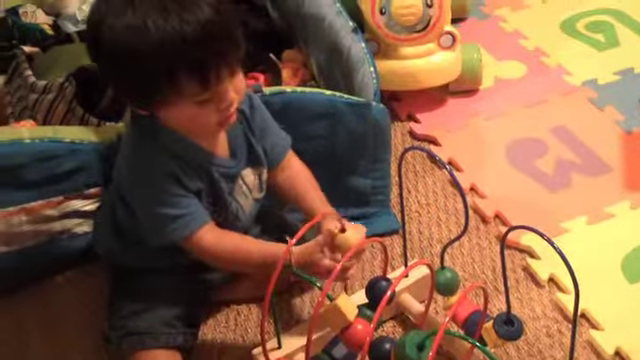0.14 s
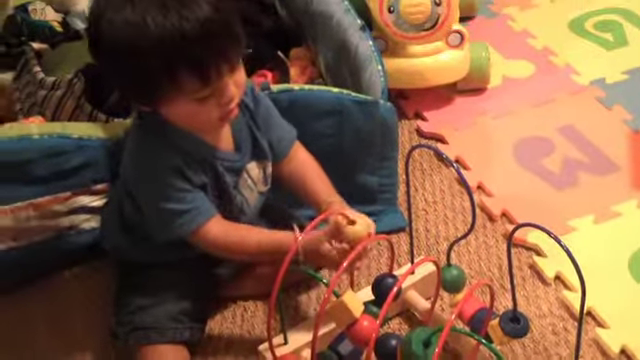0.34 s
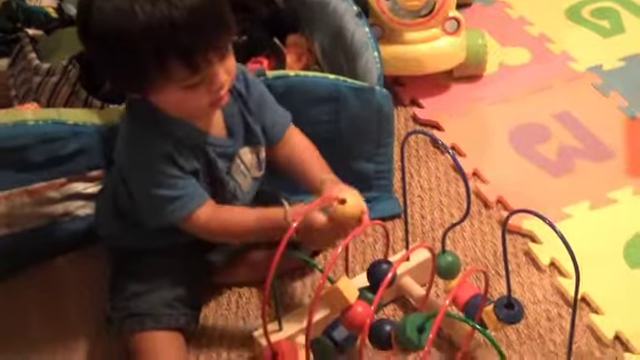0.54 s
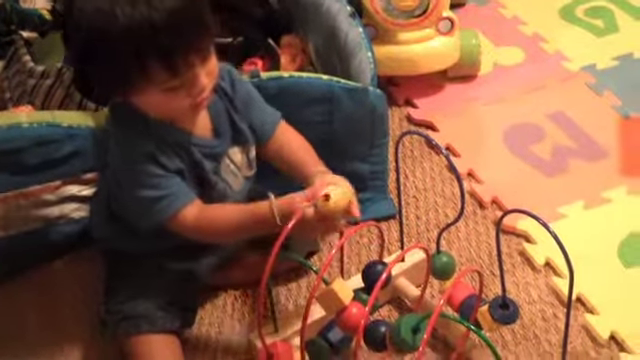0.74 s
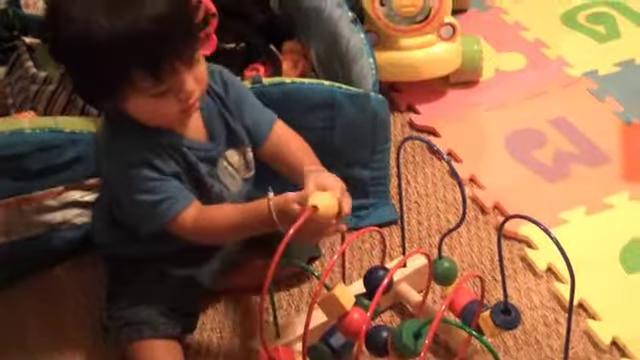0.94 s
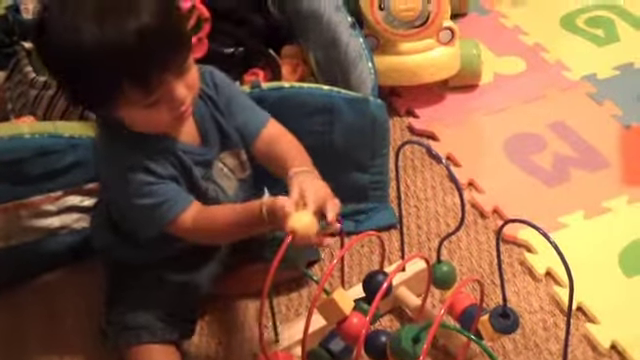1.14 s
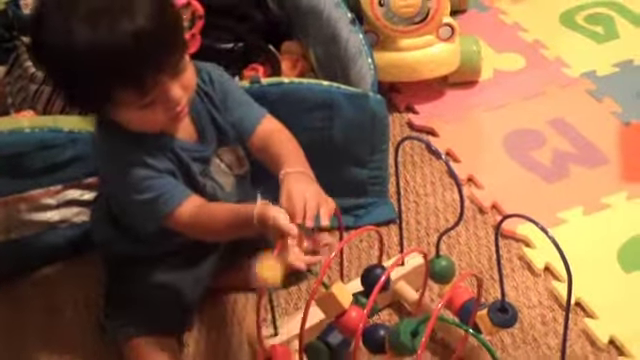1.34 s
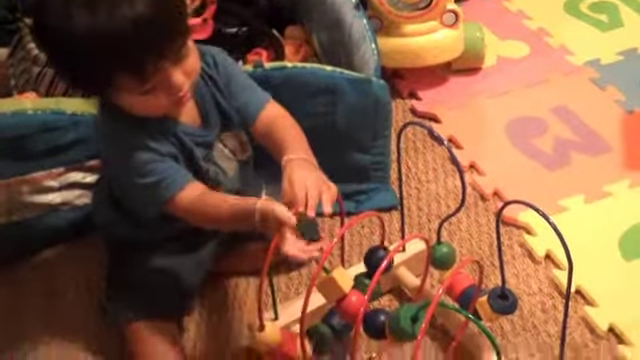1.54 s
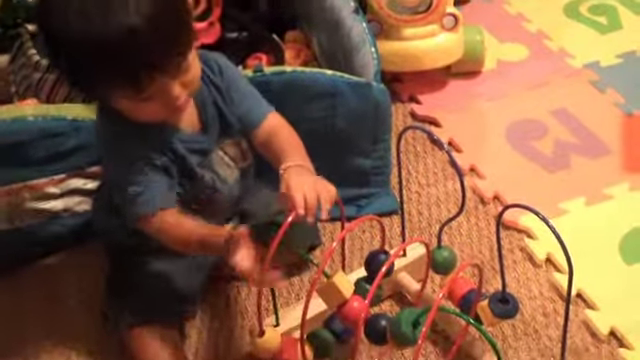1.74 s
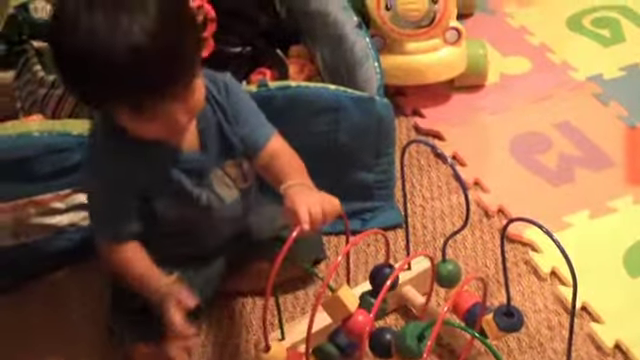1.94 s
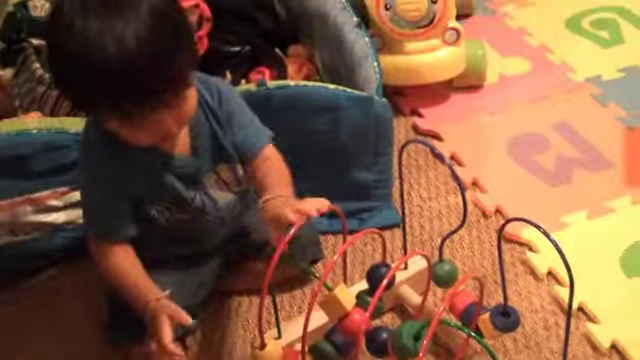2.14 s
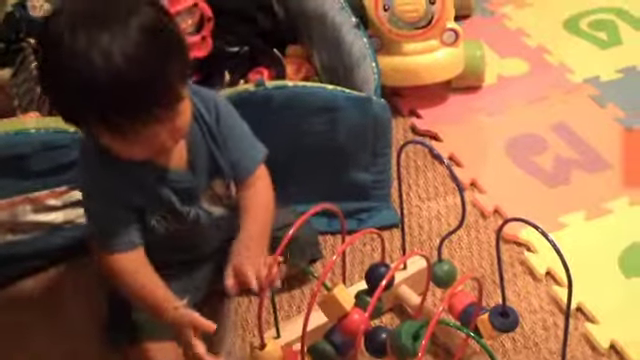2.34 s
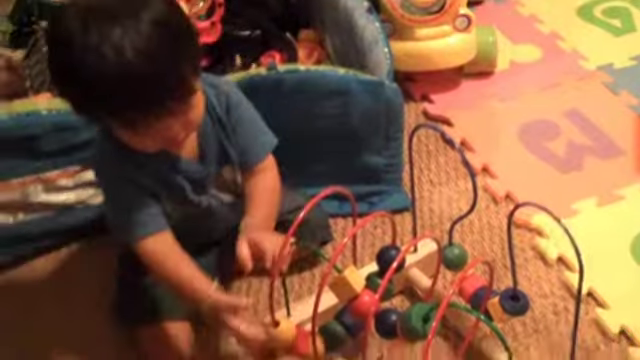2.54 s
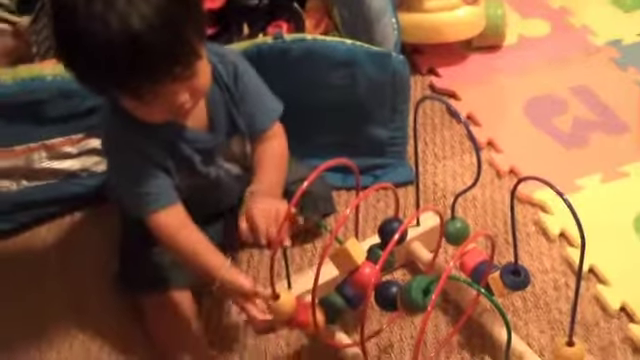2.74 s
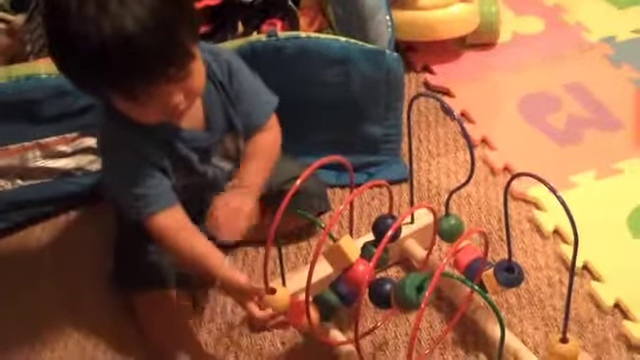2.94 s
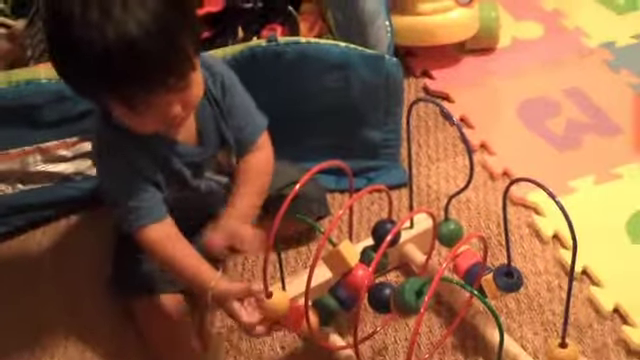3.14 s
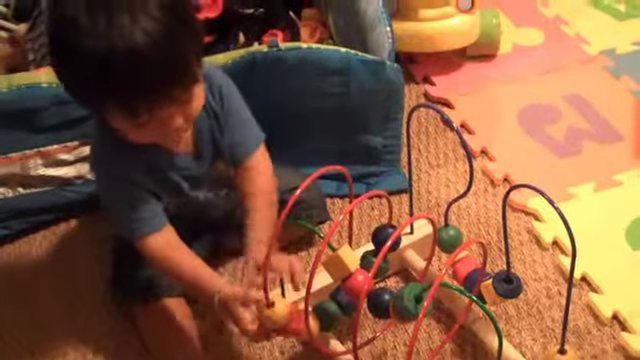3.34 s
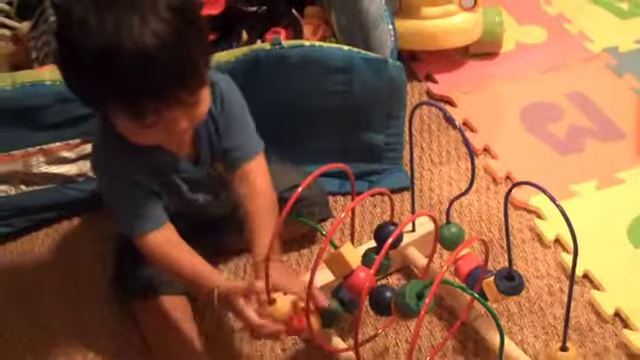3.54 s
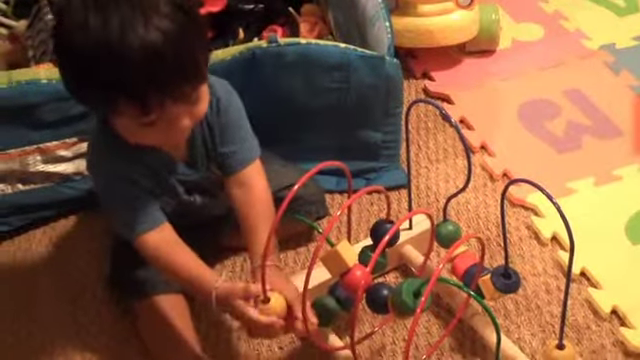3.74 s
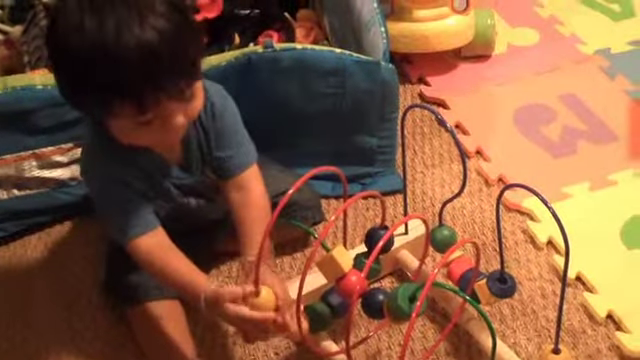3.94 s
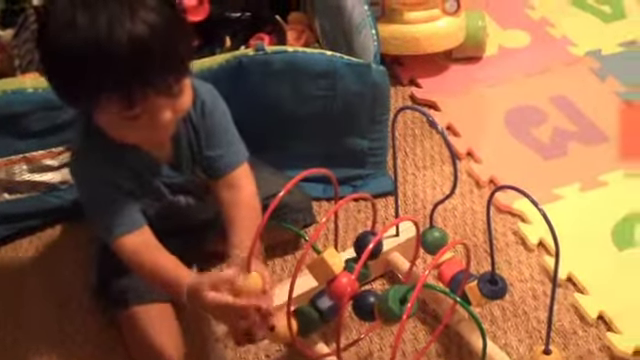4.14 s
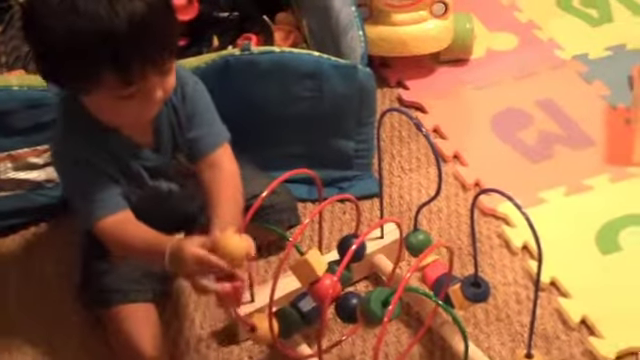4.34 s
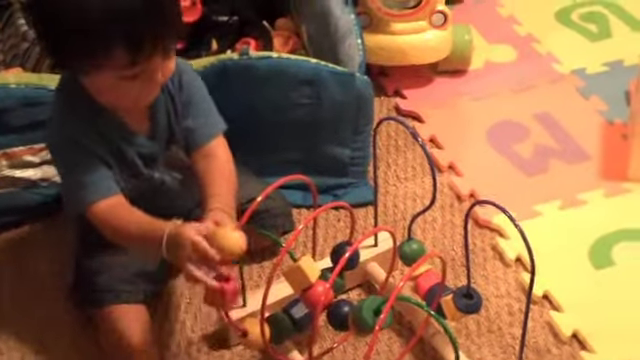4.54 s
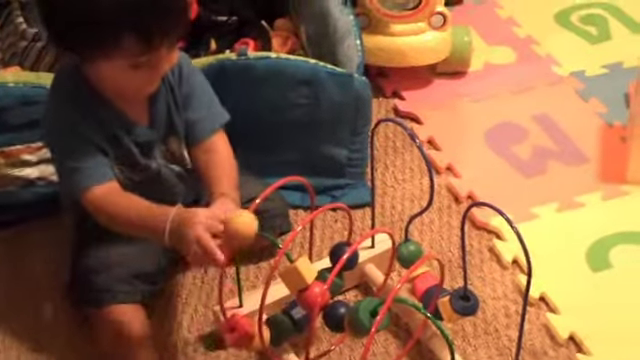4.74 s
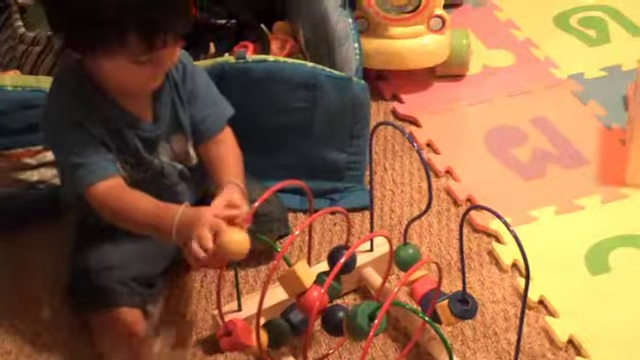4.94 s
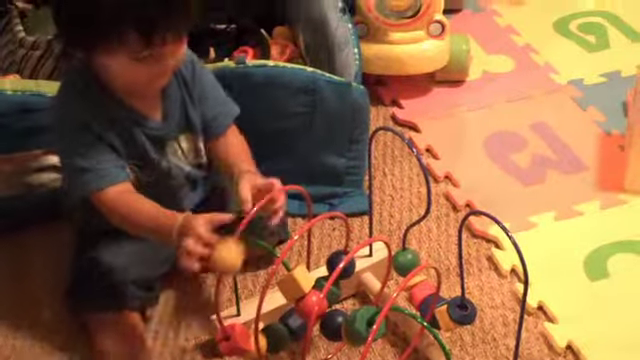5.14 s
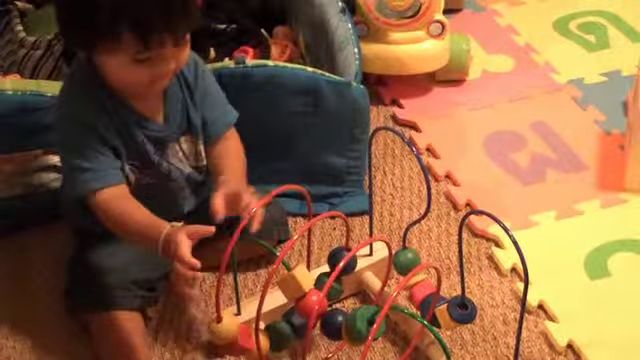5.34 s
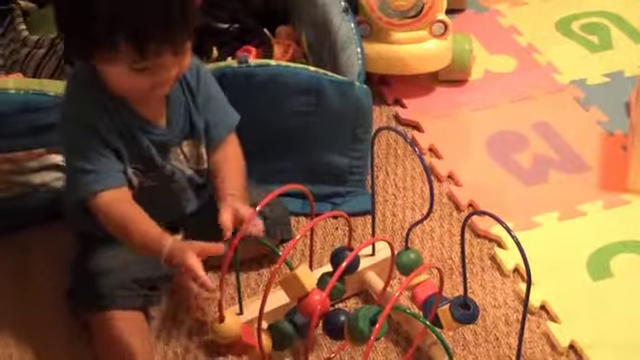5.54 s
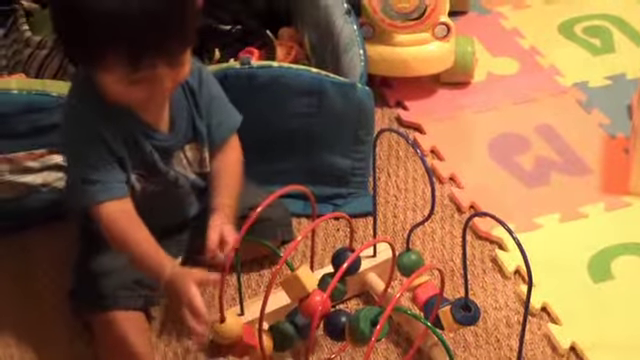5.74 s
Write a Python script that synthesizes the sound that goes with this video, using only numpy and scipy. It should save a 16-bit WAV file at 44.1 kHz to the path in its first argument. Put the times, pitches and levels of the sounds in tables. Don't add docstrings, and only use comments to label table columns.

```python
import sys
import numpy as np
from scipy import signal
from scipy.fft import rfft, irfft
from scipy.io import wavfile
from scipy.ndimage import uniform_filter1d

SR = 44100
rng = np.random.default_rng(int(sys.argv[2]) if len(sys.argv) > 2 else 0)


def generate_wav(sig):
    pcm = np.round(np.clip(np.atleast_2d(sig).T, -1, 1) * 32767).astype(np.int16)
    wavfile.write(sys.argv[1], SR, pcm)


def voltage_ratio(decibels):
    exponent = np.asarray(decibels, float) / 20
    return 10 ** exponent


N = 254623

# (rate [Hz], depth [fraction], time of a swell [s])
HUM_THROBS = [(2.1, .15, 4.4), (3.14, 0.23, 4.68)]
# (pitch [Hz], level [dB])
FAINT_TONES = [(207, -84.5), (331, -90.5), (561, -80.5)]
# (frequency [Hz], level [dB per Hz])
AIR_COLOR = [(10, -10.5), (25, -13.5), (110, -18.5), (200, -15.5), (300, -16), (600, -18), (1700, -22.5),
             (4000, -31.5), (7200, -37.5), (8000, -45), (8700, -61), (9200, -103)]
# (pitch [Hz], level [dB], time to fade 60 dB [s])
FRAME_TONES = [(1060, -8, .12), (1157, -4, .12), (1188, -4, .15), (1265, -2, .2), (1378, -6, .2),
               (1596, -12, .2), (1745, -4, .12), (1836, -2, .12), (1944, -8, .15), (2060, -6, .15),
               (2105, -4, .2), (2196, -2, .25), (2225, -6, .2), (2376, 0, .3), (2466, -4, .24),
               (2640, -6, .15), (2740, -3, .1), (2800, -5, .1), (2880, -2, .13), (3025, -3, .1),
               (3128, -8, .15), (3300, -8, .12), (3460, -6, .1), (3690, -8, .12), (3900, -4, .07),
               (4025, -6, .08), (4300, -9, .05), (4800, -10, .05), (5270, -11, .04), (5800, -14, .04)]
# (time [s], peak [dB], base board [dB], short boards [dB], wires [dB])
HAND_TAPS = [(1.2482, -74, 1, 13.5, 7.5), (2.5448, -41, -13, 1, -7), (2.5554, -41, -0.5, -5.5, -8.5),
             (2.5681, -40, -18.5, -6, -10), (2.6423, -39.5, -8, 0.5, -8), (2.7924, -57, -5, -3.5, -11),
             (2.8741, -52, -3.5, -11, -14), (3.206, -54, -3, -9, -14.5), (3.2327, -37, -7, -0.5, -4.5),
             (3.5403, -50, -2, -7, -7), (3.547, -52, -6, -3, -16), (3.6125, -50, 2.5, 3.5, -0.5),
             (3.6202, -42.5, -14.5, -2.5, -18), (3.7013, -56.5, -13, 0, -6.5), (3.824, -52, -2.5, -19, -24),
             (3.8779, -55, -5.5, -3.5, -15), (4.1609, -46, -6, -9.5, -17), (4.316, -47.5, -1.5, -7, -13),
             (4.9379, -59, 4.5, -13, -24), (4.9942, -40, -4.5, -0.2, -9), (5.1511, -57, -3, -12.5, -21)]
# (time [s], peak [dB], base board [dB], short boards [dB], wires [dB])
FALLING_TAPS = [(1.3988, -49, -7, -15, -17.5), (1.4175, -35, -4, 1, -5), (1.4255, -50.5, -9, 4, 1),
                (1.4637, -23, -6.5, 3, -2.5), (4.6775, -46, -1.5, -6, -13.5),
                (4.693, -39.5, -24, 3.5, -1.5), (4.7135, -24, -6, 4, -3.5),
                (4.736, -28.5, -4.5, -10.5, -3.5), (5.214, -60, 2, -0.5, -10), (5.251, -33, -4, -1, -1),
                (5.2736, -26.5, -2.5, 4.5, 3.5), (5.2883, -25.5, -15, -5, -3.5),
                (5.3136, -35.5, -5, -13, -23)]
# (middle of band [Hz], level [dB], time to fade 60 dB [s])
ROOM_ECHO = [(704, -49, 0.43), (1420, -38.5, 0.35), (2820, -40.5, 0.34), (5100, -42.5, 0.33),
             (7530, -41, 0.13)]
# (time [s], level [dB])
BEAD_SLIDES = [
    [(1.3, -77), (1.33, -66.5), (1.35, -69.5), (1.366, -55.5), (1.38, -49), (1.392, -65.5), (1.418, -52),
     (1.46, -54)],
    [(3.07, -79), (3.13, -70), (3.2, -91)],
    [(4.65, -77.5), (4.676, -82), (4.684, -50), (4.712, -49)],
]
# (time [s], peak [dB], ring [Hz], time to fade 60 dB [ms], thud [dB])
BEAD_DROPS = [
    (1.46245, -8, 4950, 9, 1),
    (4.7131, -10.5, 4500, 4.5, -8),
    (5.27455, -8, 5500, 4, -3),
]
# (time [s], gain change [dB], jump of the bias [full scale])
GAIN_STEPS = [
    (1.4626, -1.6, -.0078),
    (1.809, .7, .0026),
    (1.843, .9, .0028),
    (4.7134, -1, -.0031),
    (5.069, 1, .0029),
    (5.2747, -1, -.0038),
    (5.634, 1, .003),
]


def band(x, lo_hz, hi_hz, order=2):
    return signal.sosfilt(signal.butter(order, [lo_hz, hi_hz], "band", fs=SR, output="sos"), x)


def unit(x):
    return x / np.sqrt(np.mean(x ** 2))


def add(out, s, sound):
    i = int(s * SR)
    out[i:i + len(sound)] += sound[:N - i]


def curve(rows, column=1, silence=None):
    rows = np.array(rows)
    return np.interp(np.arange(N) / SR, rows[:, 0], rows[:, column], silence, silence)


def walk(rate):
    hold = int(SR / rate)
    values = rng.standard_normal(N // hold + 1)
    return uniform_filter1d(np.repeat(values, hold), hold)[:N]


def rings(hz, t60):
    t = np.arange(SR // 3) / SR
    return np.sin(2 * np.pi * np.outer(hz, t)) * 1000. ** -np.outer(1 / t60, t)


def hum():
    t = np.arange(N) / SR
    throb = 1 + sum(depth * np.cos(2 * np.pi * rate * (t - s)) for rate, depth, s in HUM_THROBS)
    level_db = -65 + 1.14 * walk(5)
    tone = voltage_ratio(level_db) * throb * np.sin(2 * np.pi * 236.85 * t)
    faint = 0
    for hz, db in FAINT_TONES:
        level = voltage_ratio(db + 2.4 * walk(3.1))
        faint = faint + level * np.sin(2 * np.pi * hz * t + 1.1 * walk(2.3))
    return np.sqrt(2) * (tone + faint)


def air():
    hz, db = np.transpose(AIR_COLOR)
    f = np.arange(1, N // 2 + 2) * SR / N
    color = voltage_ratio(np.interp(np.log(f), np.log(hz), db))
    hiss = irfft(rfft(rng.standard_normal(N)) * color, N)
    level_db = -69.5 + .5 * walk(1.7)
    return hiss * voltage_ratio(level_db) / np.std(band(hiss, 400, 6400))


def knocks():
    hz, db, t60 = np.transpose(FRAME_TONES)
    modes, out = rings(hz, t60), np.zeros(N)
    t = np.arange(modes.shape[1]) / SR
    rise_s, rattle_s, clatter_t60_s, clatter_db = .0016, .009, .08, -3.
    underside_db, tick_db = -15, -12
    parts = [(640, 980), (1040, 1400), (1700, 1960), (2080, 2480), (2700, 3250), (3400, 4700), (5400, 8400)]
    for s, peak_db, base_db, short_db, wire_db in HAND_TAPS + FALLING_TAPS:
        damp_db_s = max(520.5 - 7.5 * (peak_db + 52), 0)
        spot = rng.standard_normal((2, len(hz)))
        noise = rng.standard_normal((2, len(t)))
        ring = (np.sign(spot[1]) * voltage_ratio(db + 2.5 * spot[0])) @ modes
        grain_db = 3. * unit(uniform_filter1d(noise[1], size=60))
        clatter = noise[0] * voltage_ratio(grain_db) * 1000. ** (-t / clatter_t60_s)
        rise = 1 - np.exp(-t / rise_s)
        swell = rise * voltage_ratio(-damp_db_s * np.maximum(t - rattle_s, 0))
        levels_db = (underside_db, base_db, -6, -3, short_db, wire_db, wire_db + tick_db)
        for (lo, hi), part_db in zip(parts, levels_db):
            clear = band(ring * swell, lo, hi)
            loose = band(clatter * swell, lo, hi)
            sound = (hi < 5000) * unit(clear) + voltage_ratio(clatter_db) * unit(loose)
            add(out, s, voltage_ratio(peak_db + part_db) * sound / np.abs(sound).max())
    return out


def room(x):
    t = np.arange(SR // 2) / SR
    tail = 0
    for hz, db, t60 in ROOM_ECHO:
        noise = band(rng.standard_normal(len(t)), hz / 1.556, hz * 1.52)
        tail = tail + voltage_ratio(db) * unit(noise) * 1000. ** (-t / t60)
    first_wall = np.clip((t - .002) / 0.002, 0, 1)
    return signal.fftconvolve(x, tail * first_wall)[:N]


def slides():
    hz, db, t60 = np.transpose(FRAME_TONES)
    ticks_per_sample = 2500. / SR
    ticks = (rng.random(N) < ticks_per_sample) * rng.standard_normal(N)
    body_db = db - 4.7 * hz / 1000 - 25. * (hz > 3200)
    body = band(voltage_ratio(body_db) @ rings(hz, .5 * t60), 1000, 3300)
    gain = sum(voltage_ratio(curve(rows, silence=-150)) for rows in BEAD_SLIDES)
    return signal.fftconvolve(gain * ticks, body)[:N] / np.sqrt(np.sum(body ** 2) * ticks_per_sample)


def drops():
    ringing, crack = np.zeros(N), np.zeros(N)
    shares, ratios = np.array([.3, .6, .18, .12]), np.array([.94, 1.02, 1.28, .45])
    for s, peak_db, hz, t60_ms, thud_db in BEAD_DROPS:
        ring = shares @ rings(hz * ratios, np.full(4, t60_ms / 1000))
        bright, thud = band(ring, 900, 7600), band(ring, 20, 900)
        add(ringing, s, voltage_ratio(peak_db) * (bright + voltage_ratio(thud_db) * thud))
        add(crack, s, voltage_ratio(np.array([peak_db - 9])))
    return ringing, band(crack, 2600, 7000)


def gain_thumps():
    t = np.arange(N) / SR
    thumps = 0
    for s, db, jump in GAIN_STEPS:
        thumps = thumps + jump * (t >= s) * np.exp(-np.maximum(t - s, 0) / 0.087)
    return signal.lfilter(*signal.butter(1, 508, fs=SR), thumps)


def scene():
    frame = knocks() + slides()
    beads, crack = drops()
    echo = room(voltage_ratio(-10) * frame + 7.0 * crack)
    return (frame + beads + echo + hum())[None]


def roll_off(x):
    return signal.sosfilt(signal.butter(12, 8790, fs=SR, output="sos"), x)


def record(dry):
    t = np.arange(N) / SR
    gain_db = sum(db * (t >= s) for s, db, jump in GAIN_STEPS)
    dull = signal.butter(6, 6710, fs=SR, output="sos")
    capsule = signal.sosfilt(dull, dry) + air()
    bias = -.0004
    edge = signal.ellip(10, .2, 95, 8600, fs=SR, output="sos")
    mix = signal.sosfilt(edge, capsule * voltage_ratio(gain_db) + gain_thumps() + bias)
    return roll_off(mix)


dry = scene()
out = record(dry)
generate_wav(out)
```